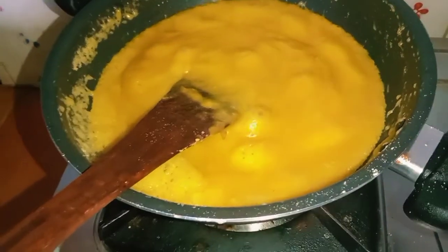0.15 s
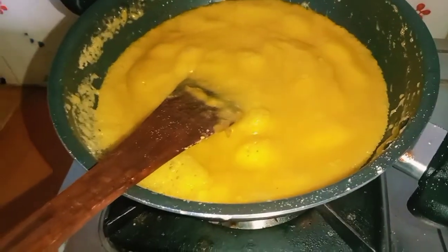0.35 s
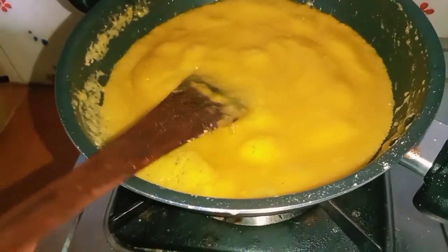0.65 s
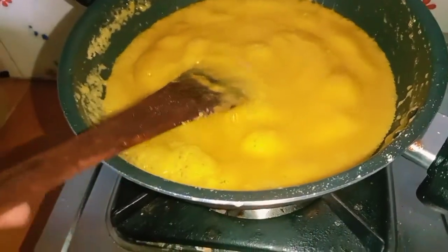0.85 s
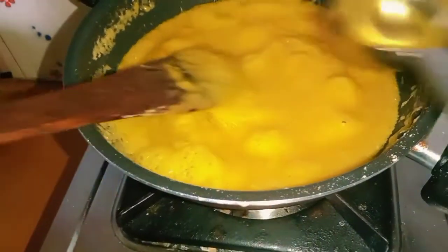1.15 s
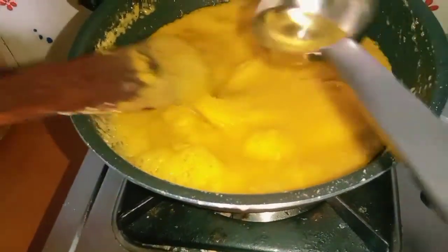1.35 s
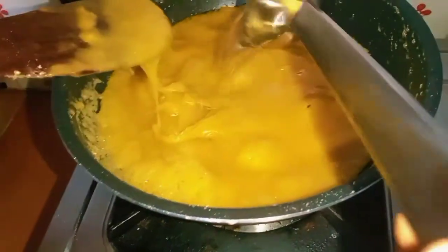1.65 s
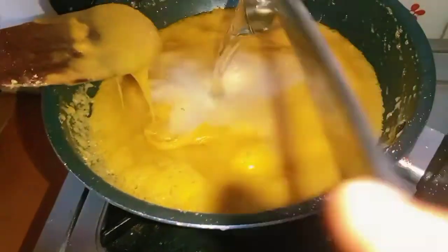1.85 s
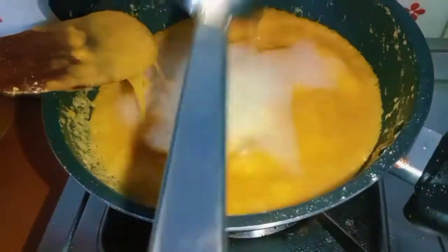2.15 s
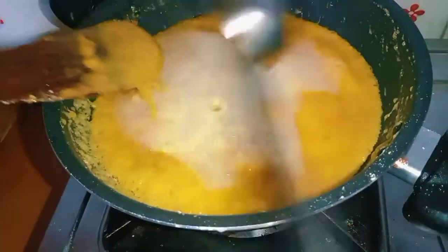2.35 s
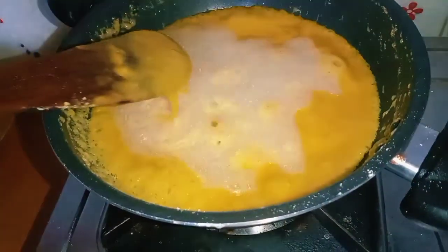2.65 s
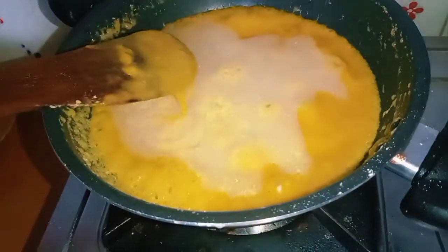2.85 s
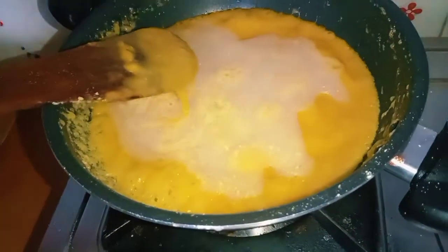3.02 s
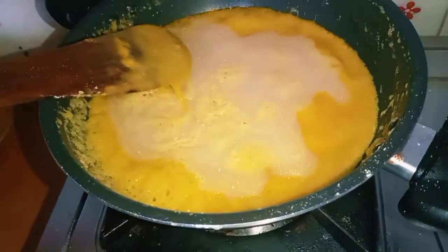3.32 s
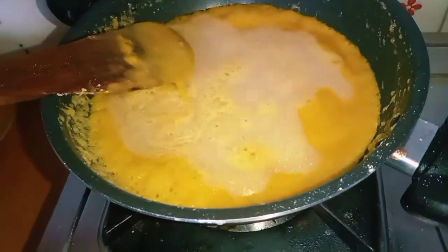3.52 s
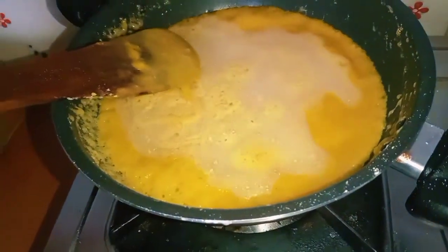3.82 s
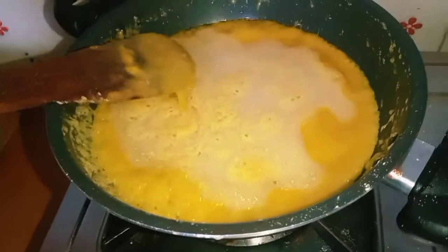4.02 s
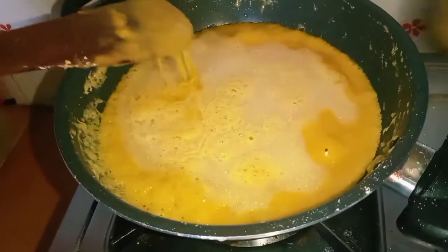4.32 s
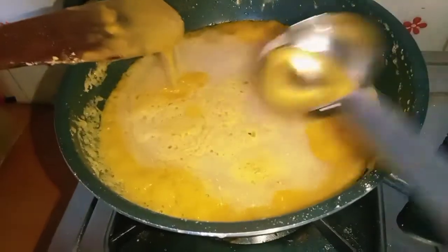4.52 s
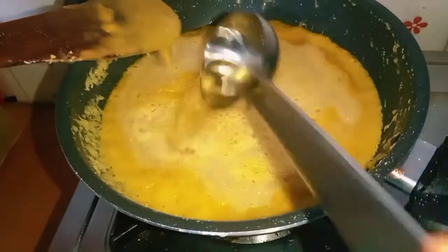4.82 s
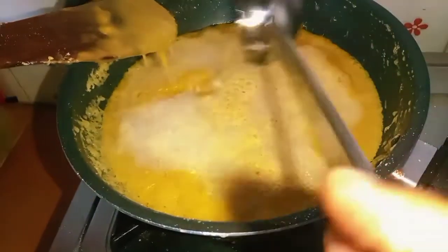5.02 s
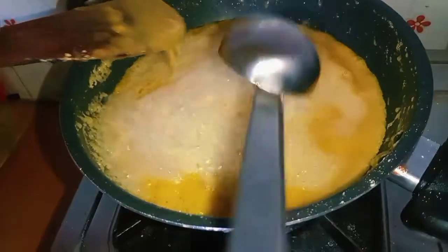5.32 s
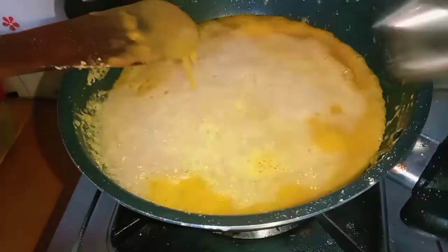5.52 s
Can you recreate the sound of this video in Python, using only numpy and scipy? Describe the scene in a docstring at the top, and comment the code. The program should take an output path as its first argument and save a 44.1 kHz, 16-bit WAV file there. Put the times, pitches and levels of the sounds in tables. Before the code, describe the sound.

Close single-microphone kitchen sound: sparse dry batter pops over a very low fluttering burner, one light metallic clink, then a swift surge of frothing, hissing oil. Midway comes a hard bright clank, by far the loudest moment, with a brief rough pot drag. The hiss fades to a finer fizz with gurgling bubbles until a second ladle of oil lifts it again.

```python
"""Hot oil, poured twice from a ladle, fizzes and froths on thick batter simmering close to a microphone:
random bursts of noise, shaped by drifting spectra, and short sines for the bubbles that ring out.
The batter crackles and pops. Steel ware clanks once lightly and once hard, as decaying modes with noise
for the weak ones; a pot then scrapes and rattles, driven by rough friction. Behind lie a fluttering gas
flame of low noise, a low pulse train, the air of the kitchen and a bird's faint gliding sines."""
import sys
import numpy as np
from scipy import signal
from scipy.io import wavfile
from scipy.ndimage import uniform_filter1d

SR = 44100
rng = np.random.default_rng(int(sys.argv[2]) if len(sys.argv) > 2 else 0)


def store_wav(level_fs):
    """Save 16-bit WAV to argv[1]."""
    pcm = np.round(np.clip(np.atleast_2d(level_fs), -1, 1) * 32767)
    wavfile.write(sys.argv[1], SR, pcm.T.astype(np.int16))


N = 250091
T = np.arange(N) / SR  # time in s

# Spectra of the background: frequency_hz, density_db (dB per Hz, relative)
# kitchen air
ROOM_SPECTRUM = [(190, -39), (330, -7), (464, -8.5), (698, -2.5), (738, -3.5), (880, -2.5), (1490, -6),
                 (1630, -8), (2740, -15), (2900, -7), (4600, -19), (5980, -18), (10100, -120)]
# roar of the flame, also the resonances that shape the throb
FLAME_SPECTRUM = [(15, -55.5), (25, -36), (59, -10.5), (78, -3), (106, -10.5), (130, -1), (160, -15),
                  (180, -3), (318, -17.5), (379, -28), (500, -28.5), (650, -62), (1100, -120)]

# Bird calls: start_s, length_s, level_db, start_pitch_hz, end_pitch_hz
BIRD_CALLS = [(0.017, 0.11, -68.5, 3700, 3880), (0.392, 0.06, -71.5, 3960, 3870)]
# Course of the flame: time_s, level_db, deep_part_db (over level_db)
FLAME_COURSE = [(0.0, -69, -1), (0.41, -69.5, -5), (0.69, -68, -1), (1.12, -69, 1), (1.72, -70, 0.5),
                (2.02, -59.5, -3), (2.37, -66.5, -4), (2.67, -58.5, 0), (2.98, -62, 2), (3.36, -60.5, -3),
                (3.69, -64.5, 7), (3.99, -61.5, 3), (4.33, -61, -4), (4.53, -63, -2.5), (4.91, -61.5, -0.5),
                (5.2, -60.5, -1.5), (5.67, -65, -4)]
# Swells of the burner's low note: start_s, length_s, level_db, pitch_hz
BURNER_SWELLS = [(2.04, .13, -49, 132), (2.64, 0.12, -49, 131), (4.32, 0.084, -48.5, 125)]

# Modes of the steel ware: frequency_hz, width_hz (at damping 1), level_db
# rings in the light clank
BOWL_MODES = [(450, 30, -14), (587, 30, -13), (1169, 25, -10), (1322, 32, -7), (1484, 28, 0),
              (1640, 30, -12), (1990, 40, -15), (2293, 30, -12), (2698, 28, -7), (3164, 18, -11),
              (3315, 30, -2), (3470, 40, -16), (3810, 60, -15), (4316, 25, -9), (4990, 20, -14),
              (5150, 70, -14), (5553, 29, 0), (5736, 60, -10), (5890, 18, -12), (6169, 31, -6),
              (6303, 26, -7), (6470, 28, -10), (6660, 27, -12), (6789, 26, -6), (7071, 38, -7),
              (7410, 30, -14), (7670, 53, -16), (8420, 31, -19)]
# rings in the hard clank
LADLE_MODES = [(673, 45, -15), (1210, 60, -14), (1950, 32, -12), (2300, 17, -4), (2420, 29, -3),
               (2610, 28, -9), (2890, 31, -3), (3020, 24, -6), (3290, 40, 0), (3850, 39, -7),
               (3980, 15, -8), (4200, 21, -9), (4330, 26, -7), (4800, 42, -6), (5120, 43, -3),
               (5490, 21, -3), (5660, 52, 0), (5970, 18, -8), (6100, 17, -9), (6470, 24, -6),
               (6750, 31, -9), (6900, 53, -10), (7280, 15, -15), (7600, 95, -9), (8630, 55, -20),
               (8840, 32, -20), (9850, 32, -19), (10400, 28, -26)]
# rings of the dragged pot
POT_MODES = [(587, 52, -11), (915, 23, -12), (1080, 27, -11), (1220, 42, -9), (1960, 20, -19),
             (2270, 100, -2), (2490, 56, -6), (3010, 39, 0), (3220, 21, -5), (3500, 120, -3),
             (3910, 30, -6), (4290, 77, -7), (4820, 44, -4), (5050, 48, -6), (5590, 52, -4), (5770, 45, -3),
             (6100, 33, -4), (6470, 31, -7), (6700, 22, -12), (7630, 110, -15), (8100, 24, -20),
             (8460, 26, -22), (8870, 110, -24)]

# Blows on the steel ware: start_s, level_db, thud_db (relative to level_db)
# light clank
BOWL_BLOWS = [(0.574, -22.5, -25), (0.581, -30, -37), (0.588, -18.5, -36), (0.596, -18.5, -26),
              (0.613, -24, -22), (0.645, -29, -14.5)]
# hard clank
LADLE_BLOWS = [(3.142, -8.5, -23), (3.146, -3.5, -29), (3.151, -4, -20), (3.165, -12, -11),
               (3.173, -6.5, -24), (3.219, -16, -31)]
# rattle of the dragged pot
POT_BLOWS = [(3.29, -19, -6.5), (3.304, -23, -22), (3.317, -19, -7.5), (3.347, -19, -9), (3.387, -15, -29),
             (3.408, -22.5, -7)]

# Course of the scrape: time_s, level_db, dull_part_db (over level_db)
SCRAPE_COURSE = [(3.19, -23, -36), (3.208, -31.5, -9.5), (3.286, -31, -4), (3.314, -20, -21),
                 (3.336, -26.5, -15), (3.41, -25, -7), (3.428, -30, -7), (3.52, -51.5, -23)]

# Spectra of the contact noises: frequency_hz, density_db (dB per Hz, relative)
# the many weak modes of the bowl
BOWL_WEAK_MODES = [(180, -53), (300, -30), (581, -33), (1000, -49), (1460, -7), (2980, -1), (3230, 5),
                   (4070, -13), (5660, 6.5), (15500, -27)]
# the many weak modes of ladle and pot
STEEL_WEAK_MODES = [(120, -46), (200, -7), (515, -46), (665, -13), (940, -28), (1190, -32), (1540, -16),
                    (2330, -4), (3240, 0), (3610, -9.5), (5590, 2.5), (10600, -20.5), (15500, -19)]
# worktop under blows and sliding pot
WORKTOP_SPECTRUM = [(100, -40), (170, -11), (318, 6.5), (486, -4), (583, 6.5), (918, 7), (976, -2),
                    (1230, 6.5), (1900, 0), (2470, -42), (4180, -120)]

# Course of the batter's hiss: time_s, level_db; the last level is held
SIMMER_COURSE = [(0.02, -62.5), (0.08, -78), (0.14, -65), (0.42, -66), (0.55, -72), (0.72, -59.5),
                 (0.89, -71), (1.0, -63.5), (1.15, -70), (1.3, -68.5), (1.49, -63.5), (1.55, -69.5),
                 (1.7, -63)]
# Single pops of the batter and small taps: start_s, peak_db (without the click), pitch_hz
BATTER_POPS = [(0.138, -50, 5400), (0.171, -50, 7720), (0.2257, -47, 6860), (0.3035, -46.5, 6680),
               (0.4134, -48, 6570), (0.7174, -40, 6500), (0.7214, -50, 6430), (0.7377, -46, 6530),
               (0.7796, -45, 6640), (0.9652, -49, 6400), (0.9792, -44, 6620), (1.0185, -47, 6830),
               (1.08, -44.5, 7000), (1.105, -45, 7600), (1.1899, -44, 6400), (1.3114, -48, 6450),
               (1.3788, -45.5, 3660), (1.4515, -46, 5330)]
# Short rises of the treble: start_s, length_s, level_db
TREBLE_FLICKERS = [(0.026, 0.044, -81), (1.162, 0.048, -71), (1.336, 0.057, -71), (1.432, 0.028, -85),
                   (1.532, 0.077, -79)]

# Spectra of batter and oil: frequency_hz, density_db (dB per Hz, relative)
# hiss of the batter
SIMMER_SPECTRUM = [(2530, -17.5), (4300, -20), (4620, -20), (4990, -6), (5380, -15), (6650, 0), (7080, -3),
                   (9180, -9.5), (10200, -11.5), (10900, -24), (11000, -48), (14300, -61), (22000, -120)]
# fierce boil, with larger bubbles
HOT_FIZZ_SPECTRUM = [(2530, -33), (4300, -18), (4780, -2.5), (5760, 1.5), (6860, -2), (8180, -10),
                     (9500, -26), (12400, -29), (20900, -120)]
# weaker boil, with smaller bubbles
MILD_FIZZ_SPECTRUM = [(2470, -49), (4200, -33), (4670, -14.5), (4780, -17), (5410, -2.5), (6590, 0),
                      (7300, -0.5), (8200, -8.5), (9500, -16), (12400, -9), (20900, -120)]
# spray, also the treble of the simmer
SPRAY_SPECTRUM = [(4710, -32), (8000, -6), (9410, -5), (11100, -4.5), (12200, 0), (14500, 3.5), (15000, 8),
                  (15600, -12)]
# dense froth
DENSE_FROTH_SPECTRUM = [(760, -60), (1300, -11), (1570, -3), (1840, -5.5), (2000, -5.5), (2390, -7),
                        (3190, -1.5), (3740, -1), (4100, -7), (4400, -3.5), (5720, -11), (9680, -120)]
# thin, patchy froth noise
THIN_FROTH_SPECTRUM = [(760, -19.5), (1300, -8.5), (1450, -36), (1600, 3), (1750, -10), (2030, -1),
                       (2200, -3.5), (3040, 2), (3780, 4), (4090, -4.5), (4300, -13), (5590, -46),
                       (9460, -120)]
# the largest bubbles, deep in the batter
GURGLE_SPECTRUM = [(210, -53), (350, -17), (387, -23), (529, -21), (678, -11), (770, -15), (880, -0.5),
                   (974, -10), (1350, -2), (1600, -5.5), (2080, -20), (3520, -120)]

# Oil on batter: time_s, fizz_db, froth_db (fine part)
SIZZLE_COURSE = [(1.66, -85, -108), (1.732, -54, -76), (1.772, -44.5, -59.5), (1.878, -33.5, -47),
                 (2.1, -33, -42), (2.72, -34, -41.5), (2.85, -36, -45.5), (3.12, -36, -45.5),
                 (3.55, -39.5, -46.5), (3.9, -41.5, -52.5), (4.12, -44, -62.5), (4.79, -48, -69.5),
                 (4.92, -44, -64.5), (5.03, -40, -57), (5.23, -39.5, -53.5), (5.45, -40, -52.5),
                 (5.67, -39.5, -63)]
# Oil meets batter: start_s, size_db, coarse_froth_db (over fine), coarse_delay_s
OIL_POURS = [(1.7, -1, -7, 0.056), (4.8, -6, -2.5, 0.0046)]
# Single big bubbles that ring out: start_s, level_db (at the onset, before softening), start_pitch_hz
RINGING_BUBBLES = [(2.089, -46.5, 883), (2.218, -41, 875), (2.459, -53, 860), (2.646, -50, 853),
                   (3.619, -58, 743), (4.242, -52.5, 707), (4.46, -53.5, 690), (4.979, -56, 690),
                   (5.199, -52, 1080), (5.309, -53, 694), (5.56, -45, 886)]

ROOM_DB, MIC_NOISE_DB, BAND_LIMIT_HZ = -74, -86, 15530
THROB_HZ, THROB_DB, THROB_T60_S = 14.63, 1.5, 0.13  # pulses per s; dB over the roar; echo decay
THROB_WAVER = 0.0019  # rms drift as a share of the pulse rate
FLUTTER_LIMIT_DB, FLUTTER_BAND_HZ = 2.5, (12.5, 22)
GUST_RMS_DB, GUST_TOP_HZ, DEEP_BELOW_HZ = 1, 9.5, 109
TREBLE_DB, TREBLE_FLICKER_RMS_DB = -82, 2.5
POP_CLICK_DB = -23  # relative to the peak of the pop
FULL_FIZZ_DB, SPRAY_DB = -34, -40.5  # spray level at full fizz, without splash
SPRAY_DB_PER_FIZZ_DB, SPRAY_LEAD_S = 0.72, 0.004
SPLASH_DB, SPLASH_DECAY_S = 5, 0.8  # extra spray after a pour of size 0 dB
GURGLE_DB, GURGLE_REST_DB = -51, -65.5  # after a pour of size 0 dB; at rest
GURGLE_RISE_S, GURGLE_FALL_DB_PER_S = 0.42, 12.5
BUBBLE_T60_S = 0.18


def gain_of(db):
    """Amplitude ratio: 20 dB is a factor of ten."""
    return 10 ** (np.asarray(db) / 20)


def evened(x):
    """Normalisation to unit rms."""
    return x / np.sqrt(np.mean(x ** 2) + 1e-20)


def curve(rows, column, late_s=0.):
    """Linear interpolation of a table column over time, delayed by late_s."""
    rows = np.array(rows)
    return np.interp(T - late_s, rows[:, 0], rows[:, column])


def add(mix, s, sound):
    """Superposition: adds a sound from s seconds on, cut off at the end of the mix."""
    part = mix[round(s * SR):][:len(sound)]
    part += sound[:len(part)]


def band_pass(x, edges_hz):
    """Band limitation by a Butterworth filter."""
    return signal.sosfilt(signal.butter(2, edges_hz, "band", fs=SR, output="sos"), x)


def split(x, hz):
    """Complementary filtering: the parts above and below hz, each at unit rms."""
    low = signal.sosfiltfilt(signal.butter(3, hz, fs=SR, output="sos"), x)
    return evened(x - low), evened(low)


def wander(top_hz):
    """Slow fluctuation: sines of random phase up to top_hz, at unit rms."""
    sines = [np.sin(2 * np.pi * (hz * T + rng.random())) for hz in np.geomspace(top_hz / 20, top_hz, 30)]
    return evened(sum(sines))


def colour(x, spectrum, patchy_db=0., wide=5, long=12, size=512):
    """Spectral shaping, with random patches wide in bins and long in frames; unit rms."""
    overlap = size * 3 // 4
    bins_hz, _, z = signal.stft(x, SR, nperseg=size, noverlap=overlap)
    hz, db = np.transpose(spectrum)
    shape_db = np.interp(np.log(bins_hz + 1), np.log(hz), db, left=-90, right=-90)
    patches = rng.standard_normal(z.shape)
    patches = uniform_filter1d(patches, max(round(wide), 1), 0)
    patches = uniform_filter1d(patches, max(round(long), 1), 1)
    z = z * gain_of(shape_db[:, None] + patchy_db * evened(patches))
    shaped = signal.istft(z, SR, nperseg=size, noverlap=overlap)[1]
    return evened(shaped[:len(x)])


def bursts(per_s, spread_db, sparse_gain):
    """Shot noise: random ticks of unequal size over a bed of too many to tell apart."""
    size_db = spread_db * np.minimum(rng.exponential(1, N), 5)
    ticks = gain_of(size_db) * rng.choice([-1, 1], N)
    sparse = evened(ticks * (rng.random(N) < per_s / SR))
    return sparse_gain * sparse + rng.standard_normal(N)


def tone(length_s, db, start_hz, end_hz, soft):
    """Frequency glide: a sine with tapered ends, soft being the tapered share of its length."""
    glide_hz = np.linspace(start_hz, end_hz, round(length_s * SR))
    wave = np.sqrt(2) * np.sin(2 * np.pi * np.cumsum(glide_hz) / SR)
    return gain_of(db) * wave * signal.windows.tukey(len(glide_hz), np.clip(soft, 0, 1))


def ring(force, modes, damping):
    """Modal resonance: each mode answers the force as a dying sine; unit energy for a unit tick."""
    t = np.arange(SR // 3) / SR
    tap = np.zeros(len(t))
    for k, (hz, width_hz, db) in enumerate(modes):
        decay = np.exp(-np.pi * damping * width_hz * t)
        tap += (-1) ** k * gain_of(db) * width_hz * decay * np.sin(2 * np.pi * hz * t)
    return signal.fftconvolve(force, tap / np.linalg.norm(tap))[:len(force)]


def room_air():
    """Broadband ambience: the air of the kitchen as noise with a patchy spectrum."""
    return gain_of(ROOM_DB) * colour(rng.standard_normal(N), ROOM_SPECTRUM, patchy_db=5.0, wide=4, long=10)


def bird():
    """Amplitude modulation: faint gliding whistles whose strength wavers at random."""
    out = np.zeros(N)
    for s, *call in BIRD_CALLS:
        add(out, s, tone(*call, soft=0.32))
    return out * (1 + 0.79 * evened(uniform_filter1d(rng.standard_normal(N), 150)))


def throb():
    """Reverberant pulse train, perhaps a motor idling nearby, smeared by echoes and room resonances."""
    rate_hz = THROB_HZ * (1 + THROB_WAVER * wander(3))
    turns = np.cumsum(rate_hz) / SR + rng.random()
    pulses = np.diff(np.floor(turns), prepend=0)
    t = T[:SR // 5]
    echoes = rng.standard_normal(len(t)) * gain_of(-60 * t / THROB_T60_S)
    smeared = signal.oaconvolve(pulses, echoes)[:N]
    return colour(smeared, FLAME_SPECTRUM, patchy_db=3.0, wide=3, long=4, size=8192)


def flame():
    """Combustion noise: a lumpy roar that flutters, and with the throb gusts; a low note swells."""
    roar = colour(rng.standard_normal(N), FLAME_SPECTRUM, patchy_db=3.0, wide=3, long=2, size=4096)
    flutter = evened(band_pass(rng.standard_normal(N), FLUTTER_BAND_HZ))
    fluttering = roar * gain_of(FLUTTER_LIMIT_DB * np.tanh(flutter))
    low = fluttering + gain_of(THROB_DB) * throb()
    gusty = low * gain_of(GUST_RMS_DB * wander(GUST_TOP_HZ))
    upper, deep = split(gusty, DEEP_BELOW_HZ)
    out = gain_of(curve(FLAME_COURSE, 1)) * (upper + gain_of(curve(FLAME_COURSE, 2)) * deep)
    for s, length_s, db, hz in BURNER_SWELLS:
        add(out, s, tone(length_s, db, hz, hz, soft=0.56))
    return out


def scrape():
    """Friction excitation: the sliding pot's rough contact rings its modes and grinds on the worktop."""
    moving = uniform_filter1d(1. * (T > SCRAPE_COURSE[0][0]) * (T < SCRAPE_COURSE[-1][0]), 900)
    level = moving * gain_of(curve(SCRAPE_COURSE, 1))
    rub = bursts(per_s=550, spread_db=10.0, sparse_gain=0.19)
    grind = colour(rub, WORKTOP_SPECTRUM, patchy_db=-0.5, wide=2, long=8)
    dull = gain_of(curve(SCRAPE_COURSE, 2)) * grind
    return level * dull + ring(level * evened(rub), POT_MODES, damping=0.7)


def clank(blows, modes, weak_modes, ring_db, clatter_db, damping, rough, spread_db, t60, bright_db,
          dulls_db_per_s):
    """Impact excitation: blows feed the clear modes, rattle the weak ones and thud on the worktop."""
    start, t = blows[0][0], np.arange(SR // 2) / SR
    hz, width_hz, mode_db = np.transpose(modes)[:, :, None]
    energy, out = np.zeros((len(modes), len(t))), np.zeros(len(t))
    for s, db, thud_db in blows:
        age = np.maximum(t - (s - start), 0)
        tilt_db = bright_db - dulls_db_per_s * (s - start)  # per octave about 3 kHz
        spot_db = spread_db * rng.standard_normal(hz.shape)  # each blow lands elsewhere, favours other modes
        struck = gain_of(db + mode_db + spot_db + tilt_db * np.log2(hz / 3000)) * width_hz / width_hz.mean()
        decaying = struck * np.exp(-np.pi * damping * width_hz * age)
        energy += decaying ** 2 * (1 - np.exp(-age / 0.003))
        tilted = [(f, d + tilt_db * np.log2(f / 3000)) for f, d in weak_modes]
        rattle = gain_of(clatter_db) * colour(rng.standard_normal(len(t)), tilted)
        rattle *= 1 - np.exp(-age / 0.0003)
        thud = gain_of(thud_db) * colour(rng.standard_normal(len(t)), WORKTOP_SPECTRUM, size=1024)
        thud *= 1 - np.exp(-age / 0.048)
        out += gain_of(db - 60 * age / t60) * (rattle + thud)
    # loose contact makes each mode waver
    waver = 1 + rough * evened(uniform_filter1d(rng.standard_normal(energy.shape), 400, 1))
    turns = hz * t + rng.random(hz.shape)
    rings = (np.sqrt(energy) * waver * np.sin(2 * np.pi * turns)).sum(0)
    return start, out + gain_of(ring_db) * rings


def batter_pop(db, hz):
    """Damped resonance: a tick and its dying noise through a narrow band, with a wide click on top."""
    t = np.arange(SR // 8) / SR
    t60 = 0.065 * (6500 / hz) ** 2  # larger, lower pops last longer
    tail = 0.073 * rng.standard_normal(len(t)) * gain_of(-60 * t / t60)
    pop = band_pass(tail + (t == 0), [0.9 * hz, 1.135 * hz])
    click = gain_of(POP_CLICK_DB - 60 * t / 0.0088) * uniform_filter1d(rng.standard_normal(len(t)), size=3)
    return gain_of(db) * (pop / abs(pop).max() + click)


def simmer():
    """Shot noise: a thin crackling hiss with flickering treble, and single pops standing out."""
    crackle = bursts(per_s=300, spread_db=2.6, sparse_gain=0.9)
    hiss = colour(crackle, SIMMER_SPECTRUM, patchy_db=4.0, wide=3, long=48)
    treble = colour(crackle, SPRAY_SPECTRUM, patchy_db=4.0, wide=30, long=6)
    treble_level = gain_of(TREBLE_DB + TREBLE_FLICKER_RMS_DB * wander(12))
    for s, length_s, db in TREBLE_FLICKERS:
        add(treble_level, s, gain_of(db) * signal.windows.tukey(round(length_s * SR), 0.4))
    out = gain_of(curve(SIMMER_COURSE, 1)) * hiss + treble_level * treble
    for s, db, hz in BATTER_POPS:
        add(out, s, batter_pop(db, hz))
    return out


def ringing_bubble(db, hz):
    """Bubble resonance: a softly starting, decaying sine that rises slightly in pitch."""
    t = np.arange(SR // 5) / SR
    envelope = gain_of(db - 60 * t / BUBBLE_T60_S) * (1 - np.exp(-t / 0.0025))
    return envelope * np.sin(2 * np.pi * hz * t * (1 + 0.026 * t))


def fizz_level_db(late_s=0.):
    """Boiling strength: the fizz level over time, 60 dB lower before the oil arrives."""
    return curve(SIZZLE_COURSE, 1, late_s) - 60 * (T < SIZZLE_COURSE[0][0])


def spray_level():
    """Droplet ejection: spray leads the fizz, follows it in part and is strongest just after a pour."""
    fizz_db = fizz_level_db(-SPRAY_LEAD_S)
    splash = np.zeros(N)
    for s, size_db, *_ in OIL_POURS:
        splash += gain_of(size_db) * (T > s) * np.exp(-abs(T - s) / SPLASH_DECAY_S)
    spray_db = SPRAY_DB + SPRAY_DB_PER_FIZZ_DB * (fizz_db - FULL_FIZZ_DB) + SPLASH_DB * splash
    return gain_of(np.minimum(fizz_db, spray_db))  # never above the fizz


def gurgle_level():
    """Addition of powers: the gurgle swells after each pour, then falls back to a rest level."""
    power = gain_of(GURGLE_REST_DB) ** 2 * np.clip((T - OIL_POURS[0][0]) / GURGLE_RISE_S, 0, 1) ** 2
    for s, size_db, *_ in OIL_POURS:
        rise = np.clip((T - s) / GURGLE_RISE_S, 0, 1) ** 3
        fall_db = GURGLE_FALL_DB_PER_S * np.maximum(T - s - GURGLE_RISE_S, 0)
        power += (rise * gain_of(GURGLE_DB + size_db - fall_db)) ** 2
    return np.sqrt(power)


def coarse_froth_level():
    """Bubble growth: coarse froth follows the fine, offset and delayed as the latest pour sets."""
    s, _, db, delay_s = np.transpose(OIL_POURS)
    pour = np.maximum(np.searchsorted(s, T) - 1, 0)
    level_db = db[pour] + curve(SIZZLE_COURSE, 2, delay_s[pour])
    return gain_of(uniform_filter1d(level_db, SR // 10))


def froth(level_db):
    """Power cross-fade: dense froth hisses evenly; thin froth is noise with stronger random patches."""
    dense = np.clip((level_db + 51) / 8, 0, 1)
    ticks = bursts(per_s=900, spread_db=3.7, sparse_gain=0.15)
    even = colour(ticks, DENSE_FROTH_SPECTRUM, patchy_db=4.0, wide=2, long=10, size=1024)
    noise = rng.standard_normal(N)
    thin = colour(noise, THIN_FROTH_SPECTRUM, patchy_db=5.5, wide=2, long=19.6, size=1024)
    return np.sqrt(dense) * even + np.sqrt(1 - dense) * thin


def fizz(level_db):
    """Bubble size sets pitch: a louder boil has larger, lower bubbles than a weak one."""
    hot = np.clip((level_db + 46.5) / 6.2, 0, 1)
    fierce = colour(bursts(2500, 1.5, 1.0), HOT_FIZZ_SPECTRUM, patchy_db=0.7, wide=6, long=34)
    mild = colour(bursts(2500, 1.2, 0.7), MILD_FIZZ_SPECTRUM, patchy_db=2.0, wide=4, long=15.5)
    return hot * fierce + np.sqrt(1 - hot ** 2) * mild


def sizzle():
    """Flash boiling: water turns to steam under the oil as fizz, spray, froth, gurgle and bubbles."""
    fizz_db, froth_db = fizz_level_db(), curve(SIZZLE_COURSE, 2)
    spray = colour(bursts(3000, 1.5, 0.65), SPRAY_SPECTRUM, patchy_db=0.7, wide=12, long=12)
    fine, coarse = split(froth(froth_db), hz=2640)
    gurgle = colour(rng.standard_normal(N), GURGLE_SPECTRUM, patchy_db=6.0, wide=2, long=6, size=1024)
    out = gain_of(fizz_db) * fizz(fizz_db) + spray_level() * spray + gurgle_level() * gurgle
    out += gain_of(froth_db) * fine + coarse_froth_level() * coarse
    for s, db, hz in RINGING_BUBBLES:
        add(out, s, ringing_bubble(db, hz))
    return out


def scene():
    """Superposition of all sources, the same on both channels."""
    mono = room_air() + bird() + flame() + scrape() + simmer() + sizzle()
    add(mono, *clank(BOWL_BLOWS, BOWL_MODES, BOWL_WEAK_MODES, ring_db=-14.0, clatter_db=-18.5, damping=1.0,
                     rough=0.33, spread_db=2.5, t60=0.15, bright_db=2.4, dulls_db_per_s=79))
    add(mono, *clank(LADLE_BLOWS, LADLE_MODES, STEEL_WEAK_MODES, ring_db=-19.5, clatter_db=-14.5, damping=0.68,
                     rough=0.44, spread_db=4, t60=0.12, bright_db=0.5, dulls_db_per_s=23))
    # the pot's later blows grow brighter
    add(mono, *clank(POT_BLOWS, POT_MODES, STEEL_WEAK_MODES, ring_db=-16.5, clatter_db=-9, damping=0.35,
                     rough=0.27, spread_db=7.5, t60=0.26, bright_db=-1.1, dulls_db_per_s=-15))
    return np.array([mono, mono])


def record(dry):
    """Transducer response: one microphone on both channels adds hiss, a bass cut and a band limit."""
    wet = dry + gain_of(MIC_NOISE_DB) * rng.standard_normal(N)
    wet = signal.sosfilt(signal.butter(2, 45, "high", fs=SR, output="sos"), wet)
    low_pass = signal.firwin(1023, BAND_LIMIT_HZ, window=("kaiser", 10), fs=SR)
    return signal.oaconvolve(wet, low_pass[None], "same")


dry = scene()
out = record(dry)
store_wav(out)
```